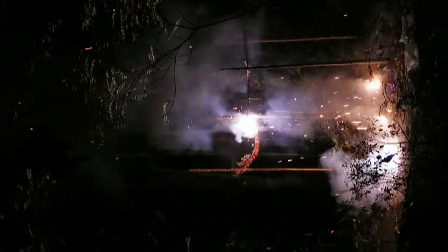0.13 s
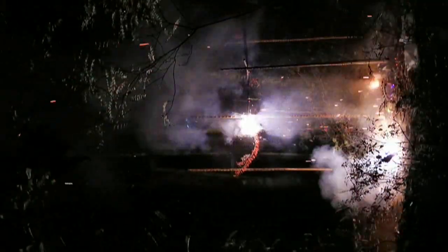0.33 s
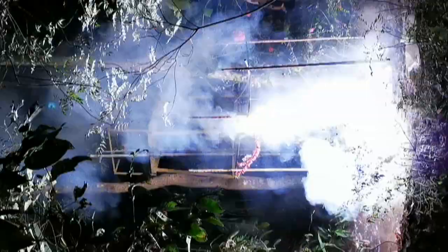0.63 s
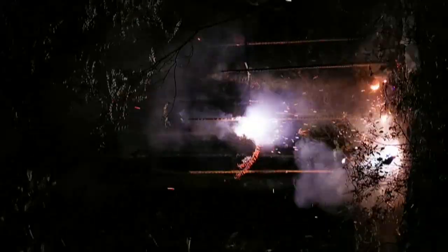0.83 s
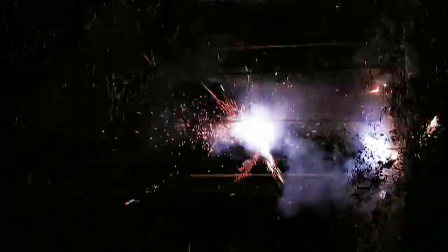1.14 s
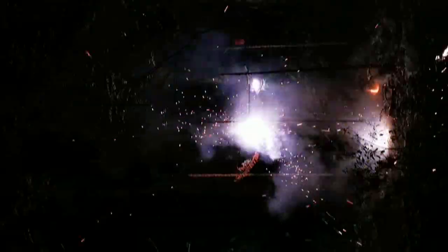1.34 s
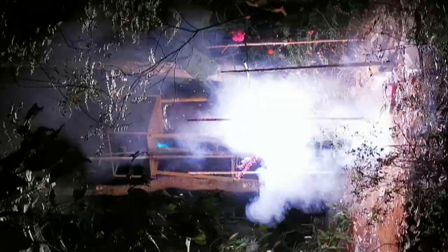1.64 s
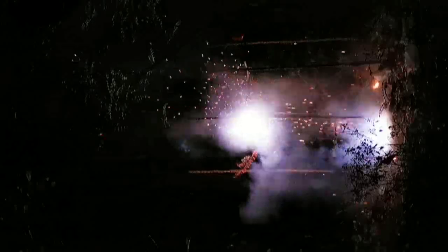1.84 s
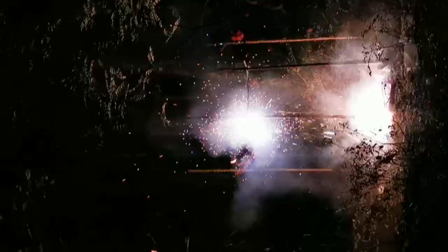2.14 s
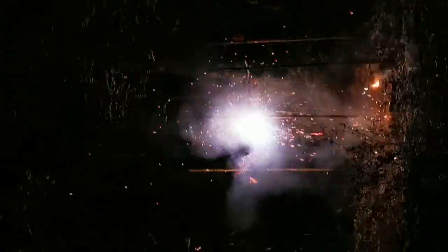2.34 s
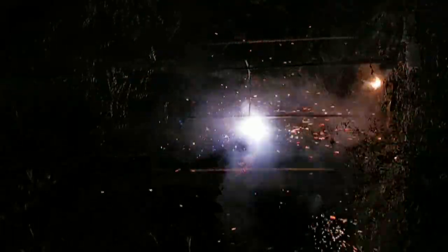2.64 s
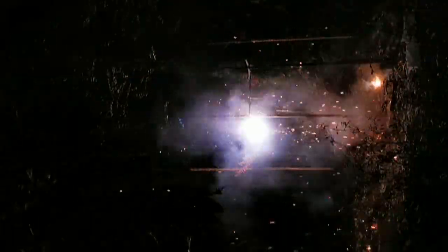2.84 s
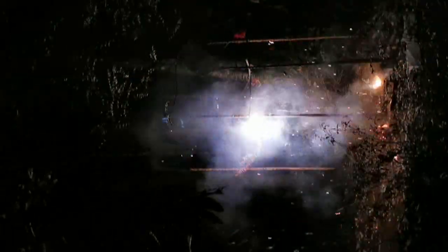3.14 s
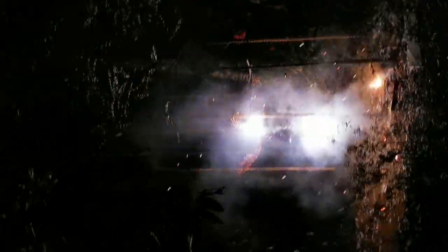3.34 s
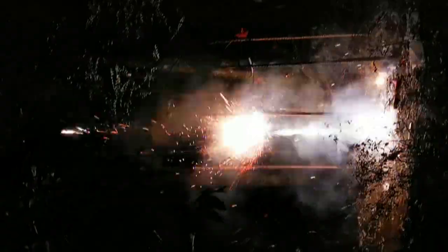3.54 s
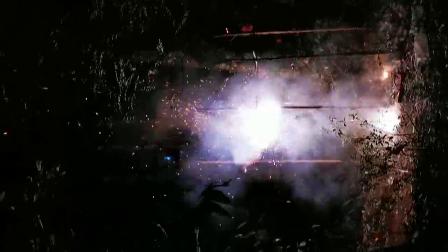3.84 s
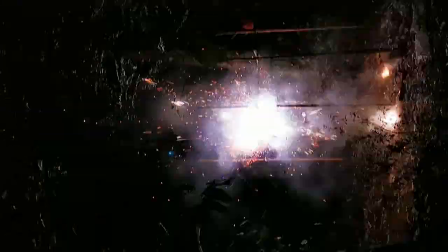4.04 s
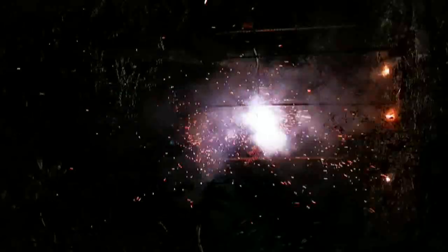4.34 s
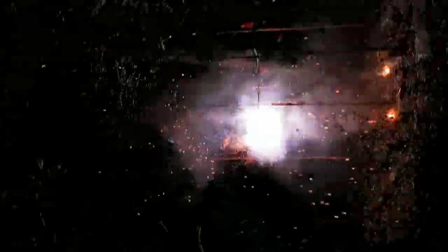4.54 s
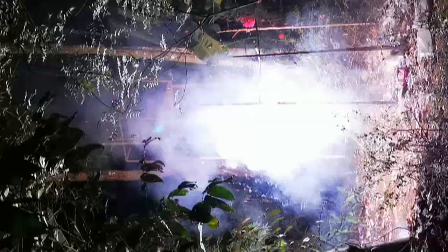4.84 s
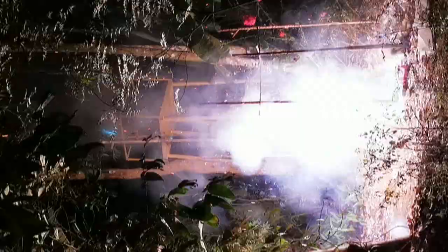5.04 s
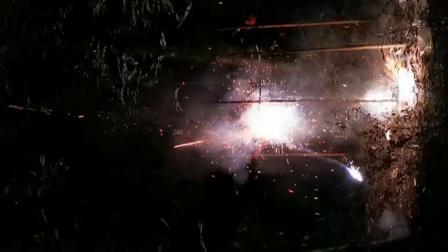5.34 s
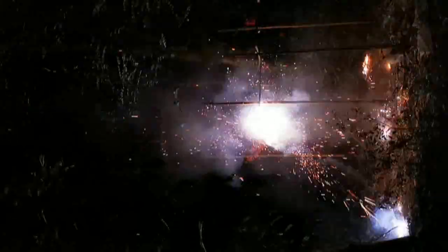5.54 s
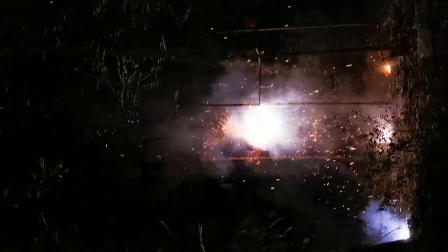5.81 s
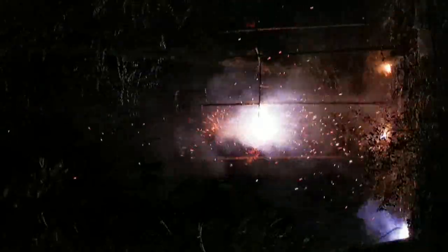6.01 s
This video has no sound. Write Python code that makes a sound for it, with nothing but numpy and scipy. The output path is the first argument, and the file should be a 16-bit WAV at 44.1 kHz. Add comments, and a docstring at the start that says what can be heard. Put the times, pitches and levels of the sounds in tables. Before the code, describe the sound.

A fading rumble and a few faint, distant pops hang in the night air. Then a string of firecrackers goes off straight ahead in a yard, in uneven clusters of sharp bangs with short gaps between. Each crack has a low thump beneath it and briefly overloads the microphone, then slaps back from the walls and rolls away over the neighbourhood.

```python
"""A fading roll and faint far pops in the night air, then a hanging string of firecrackers goes off
in a yard, in uneven clusters of bangs. Each is a shock front over a low thump from the gas ball.
It overloads the microphone for a few milliseconds, slaps back from the walls, clatters round the yard
and rolls away over the neighbourhood. Two small microphone ports colour the cracks and echoes."""
import sys
import numpy as np
from scipy import signal
from scipy.fft import rfft, irfft, next_fast_len
from scipy.io import wavfile

SR = 44100
rng = np.random.default_rng(int(sys.argv[2]) if len(sys.argv) > 2 else 0)


def master(y):
    """Save y as 16-bit WAV."""
    cut = np.clip(np.atleast_2d(y).T, -1, 1)
    pcm = np.round(cut * 32767)  # scale
    wavfile.write(sys.argv[1], SR, pcm.astype(np.int16))


N = 272097
TIME_S = np.arange(N) / SR


def from_db(db):
    """Decibels to gain."""
    return 10 ** (np.asarray(db) / 20)


def at_hz(table, hz, column=1):
    """Interpolate a table column over log frequency."""
    table = np.array(table)
    return np.interp(np.log(np.maximum(hz, 1)), np.log(table[:, 0]), table[:, column])


def add(track, start_s, sound):
    """Mix in a stereo sound."""
    start = round(start_s * SR)
    track[:, start:start + sound.shape[1]] += sound[:, :N - start]


def minimum_phase(gain):
    """Causal frequency response of the given magnitude."""
    cepstrum = irfft(np.log(gain + 1e-9))
    half = cepstrum.shape[-1] // 2
    cepstrum[..., 1:half] *= 2
    cepstrum[..., half + 1:] = 0
    return np.exp(rfft(cepstrum))


def flicker(rate_hz, channels=1):
    """Random wavering between unit-normal knots."""
    knots = rng.standard_normal((channels, N))
    return np.squeeze([np.interp(TIME_S * rate_hz, np.arange(N), row) for row in knots])


def decay(times_s, levels_db, t60_s):
    """Impulses of sound power fed into a space die exponentially."""
    power = np.bincount(np.round(np.asarray(times_s) * SR).astype(int), from_db(levels_db) ** 2, N)
    return signal.lfilter([1], [1, -10 ** (-6 / (t60_s * SR))], power + 1e-18)


def build_up(power, rise_s):
    """Echo power builds as more paths arrive."""
    pole = np.exp(-1 / (rise_s * SR))
    return signal.lfilter([1 - pole], [1, -pole], power)


# Port response: (frequency [Hz], left [dB], right [dB])
PORT_EQ = [(40, -1, -5.5), (170, -8.5, -8.5), (275, -2.5, -5), (650, -4.5, -5.5), (1300, -6, -5),
           (1875, -8, -2), (2510, 0.5, 1.5), (3024, -7.5, -15), (5860, -11, -14), (6080, -14.5, -56),
           (7600, -4.5, -20), (8280, -16, -40), (10380, -32, -42), (15500, -37.5, -58)]
def port_gain(hz):
    """Gain of the two microphone ports."""
    return from_db([at_hz(PORT_EQ, hz, column=1), at_hz(PORT_EQ, hz, column=2)])


# Night air spectrum: (frequency [Hz], level [dB])
NIGHT_EQ = [(40, 16), (150, -26), (500, 0), (1500, -5), (5000, -10), (15000, 0)]
def night_air(hz, level_db=-63.5):
    """Band power of the steady background."""
    return from_db(level_db + at_hz(NIGHT_EQ, hz)) ** 2


# Distant pops: (time [s], level at 2 kHz [dB], tilt [dB/octave], t60 [s])
POPS = [(.078, -52.5, 3.5, 0.51), (.338, -64, 4, 0.48), (.486, -66, 4, 0.43), (3.477, -52.5, -3, 0.021)]
def far_pops(hz):
    """Band power of faint pops farther off."""
    octaves = np.log2(hz / 2000)
    return sum(decay([time_s], [db + tilt * octaves], t60_s) for time_s, db, tilt, t60_s in POPS)


# Roll spectrum: (frequency [Hz], level [dB])
ROLL_EQ = [(40, -16), (120, -1.5), (300, -5.5), (650, -1), (1100, 2.5), (2400, 1), (4000, 4.5), (7500, 8.5),
           (10000, 4), (15000, -12)]
# Roll decay: (frequency [Hz], t60 [s])
ROLL_DECAY = [(60, 3.5), (300, 2.12), (1500, 1.65), (3500, 1.12), (7500, 0.8), (15000, 0.29)]
def far_roll(hz, level_db=-16, db_per_echo_db=1.066, rise_s=0.063, waver_db=0.5):
    """Band power of bangs rolling over the neighbourhood; an earlier one fades at the start."""
    times_s, _, echo_db, *tone = np.transpose(CRACKERS)
    t60_s = at_hz(ROLL_DECAY, hz)
    levels_db = level_db + db_per_echo_db * echo_db + bang_tone_db(hz, *tone)
    power = build_up(decay(times_s, levels_db, t60_s), rise_s)
    earlier_bang_db = -51.5 + 10.5 * (hz < 550)
    power += from_db(earlier_bang_db - 60 * TIME_S / t60_s) ** 2
    return power * from_db(at_hz(ROLL_EQ, hz) + waver_db * flicker(43)) ** 2


# Yard echo spectrum: (frequency [Hz], level [dB])
YARD_EQ = [(40, -15), (120, -3.5), (280, -2.5), (520, -3), (680, -1.5), (1250, 1.5), (2400, -2.5),
           (4000, 0), (7500, 0), (15000, -1.5)]
# Yard echo decay: (frequency [Hz], t60 [s])
YARD_DECAY = [(60, 0.44), (300, 0.36), (1500, 0.32), (7000, 0.4), (15000, 0.32)]
# Yard echo build-up: (frequency [Hz], rise [s])
YARD_ATTACK = [(300, 0.0081), (1500, 0.0087), (4000, 0.0068)]
def yard_echo(hz):
    """Band power of the yard's quick reverberation."""
    times_s, _, echo_db, *tone = np.transpose(CRACKERS)
    levels_db = echo_db + bang_tone_db(hz, *tone) + at_hz(YARD_EQ, hz)
    return build_up(decay(times_s, levels_db, at_hz(YARD_DECAY, hz)), at_hz(YARD_ATTACK, hz))


# Left-right likeness of echoes: (frequency [Hz], correlation [ratio])
COHERENCE = [(40, .62), (200, 0.94), (1000, 0.87), (2400, 0.96), (3200, 0.035), (6000, 0.028),
             (15000, 0.088)]
# Yard resonances: (centre [Hz], width [Hz], gain [dB])
MODES = [(124, 12, 4), (517, 27, 4.5), (640, 170, -3), (830, 31, 1), (1243, 110, 1.5), (1500, 17, 5),
         (1720, 11, -15), (2400, 27, 2)]
# Right port lag towards its resonance: (frequency [Hz], lag [rad])
RIGHT_LAG = [(600, 0.038), (1100, .25), (1500, 0.9), (2000, 0.85), (2400, 1.63), (2900, 2.5)]
def diffuse_field(hz):
    """Spectrum of unit-rms noise from all round, coloured by yard and ports."""
    coherence = at_hz(COHERENCE, hz)
    mid, side = rfft(rng.standard_normal((2, 2 * (len(hz) - 1))))
    modes_db = sum(db / (1 + (2 * (hz - centre) / width) ** 2) for centre, width, db in MODES)
    field = np.sqrt(1 + coherence) * mid + np.sqrt(1 - coherence) * side * [[1], [-1]]
    field *= port_gain(hz) * from_db(modes_db)
    field[1] *= np.exp(-1j * at_hz(RIGHT_LAG, hz))
    return field / np.std(irfft(field))


def surroundings(clatter_db=1.37, uneven_db=0.5, bands=17):
    """Air, pops, roll and yard echo set the power of the diffuse field, band by band."""
    hz = np.fft.rfftfreq(2 * next_fast_len(N // 2 + 1), 1 / SR)
    field = diffuse_field(hz)
    # Single reflections stand out, each louder at one port.
    clatter = from_db(clatter_db * flicker(450) - uneven_db * flicker(900, channels=2)) ** 2
    centres_hz = np.geomspace(45, 14000, bands)
    out = np.zeros((2, N))
    for k, band_hz in enumerate(centres_hz):
        band_gain = np.interp(np.log(hz + 1), np.log(centres_hz), np.arange(bands) == k)
        power = night_air(band_hz) + far_pops(band_hz) + far_roll(band_hz) + yard_echo(band_hz) * clatter
        out += irfft(field * band_gain)[:, :N] * np.sqrt(power)
    return out


# Wall reflections: (delay [s], gain [dB], low-pass [Hz])
SLAPS = [(0.0164, -8, 3000), (0.0261, -21.5, 1100), (.0522, -26.5, 1400)]
def wall_slaps(direct):
    """Each wall throws the cracks back later, weaker and duller."""
    out = np.zeros((2, N))
    for delay_s, db, cutoff_hz in SLAPS:
        dulled = signal.sosfilt(signal.butter(1, cutoff_hz, fs=SR, output="sos"), direct + 1e-18)
        add(out, delay_s, from_db(db) * dulled)
    return out


# Pressure swings: (frequency [Hz], t60 [s], level re bang strength [dB])
SWINGS = [(65.6, 0.033, -19.5), (138.4, 0.019, -4.5)]
def thumps(uneven_db=1.6, length_s=0.2):
    """The gas ball swells and falls back: damped pressure swings that meet the ports unevenly."""
    t = np.arange(round(length_s * SR)) / SR
    swing = sum(np.sin(2 * np.pi * hz * t) * from_db(db - 60 * t / t60_s) for hz, t60_s, db in SWINGS)
    out = np.zeros((2, N))
    for time_s, crack_db, echo_db, *_ in CRACKERS:
        strength_db = (crack_db + echo_db) / 2
        add(out, time_s, from_db(strength_db + uneven_db * rng.standard_normal((2, 1))) * swing)
    return out


def bang_tone_db(hz, hollow_db, ring_hz, ring_db=3.5, ring_octaves=0.79):
    """Some bangs, mostly weak ones, sound hollow: lows and top raised around a 1.4-3 kHz dip.
    Each rings round one pitch."""
    bass, below_dip, below_treble, below_top = (
        1 / (1 + (hz / corner_hz) ** 8) for corner_hz in (230, 1350, 3000, 9000))
    low_mids, treble = below_dip - bass, below_top - below_treble
    ring = np.exp(-(np.log2(np.maximum(hz, 1) / ring_hz) / ring_octaves) ** 2)
    return ring_db * ring + hollow_db * (1.96 * bass + low_mids + 0.63 * treble)


# Direct blast colour: (frequency [Hz], gain [dB])
BLAST_EQ = [(40, -1), (150, 10.5), (400, 4.5), (900, 5.5), (2000, 3.5), (4000, 5.5), (8000, 2.5),
            (15000, 7.5)]
def blast(hollow_db, ring_hz, push_s=0.00016, spread_s=0.0026, fade_s=0.0059, scatter=0.7, drive=3.1):
    """A shock front and its close reflections from ground and frame, flattened by overload."""
    size = 2048
    t, hz = np.arange(size) / SR, np.fft.rfftfreq(size, 1 / SR)
    shock = (1 - t / push_s) * np.exp(-t / push_s)   # push, then suction
    window = np.exp(-t / fade_s) / (1 + (t / spread_s) ** 8)
    shared, own = rng.standard_normal(size), rng.standard_normal((2, size))
    coherence = 0.87 * at_hz(COHERENCE, hz)
    reflections = irfft(rfft(shared) * np.sqrt(coherence) + rfft(own) * np.sqrt(1 - coherence))
    clipped = np.tanh(drive * (shock + scatter * window * reflections))
    colour = port_gain(hz) * from_db(at_hz(BLAST_EQ, hz) + bang_tone_db(hz, hollow_db, ring_hz))
    colour[1] *= from_db(6 * hz ** 2 / (hz ** 2 + 6000 ** 2))   # overload brightens the right port
    wave = irfft(rfft(clipped) * minimum_phase(colour))
    return wave / np.sqrt(np.sum(wave ** 2) / (2 * 0.0036 * SR))   # energy of 3.6 ms at unit rms


# Firecrackers, and at 2.71 s a loud wall echo of the 2.69 s bang: (time [s], crack [dB], echo [dB], hollowness
# [dB], ring [Hz])
CRACKERS = [(0.6696, -7.5, -17.5, -0.5, 980), (0.7868, -19, -19.5, -1, 530), (1.1276, -12.5, -16, -6, 650),
            (1.157, -20.5, -24.5, 1, 520), (1.176, -20, -25, 4.5, 587), (1.779, -15.5, -29, 6, 743),
            (2.008, -23, -30.5, -6, 650), (2.036, -14, -17.5, 2, 1574), (2.211, -23.5, -37, 5.5, 1100),
            (2.623, -11, -21, -1.5, 2400), (2.69, -16.5, -20, -3.5, 1460), (2.71, -25, -51, -4, 1640),
            (3.553, -17, -29.5, 4, 880), (3.663, -23, -36, 9, 393), (3.759, -15.5, -19, -1, 1300),
            (3.796, -18, -24, 0.5, 2400), (3.826, -17.5, -24.5, -3.5, 2600), (4.055, -17, -24.5, 1, 1660),
            (4.17, -16.5, -26.5, 2, 590), (4.235, -27, -55, 8, 607), (4.266, -15.5, -17.5, 0, 1720),
            (4.333, -16.5, -16.5, -5.5, 1680), (4.669, -13, -21, -2.5, 2050), (4.761, -20, -20.5, -2, 1790),
            (4.808, -19, -19.5, 0.5, 340), (4.998, -14.5, -15.5, -7, 2130), (5.051, -16.5, -19, 0, 2430),
            (5.374, -13.5, -17.5, -1, 2460), (5.454, -20, -13, -3, 1300), (5.591, -15, -15.5, -2.5, 1630),
            (5.65, -20.5, -46, -5, 1160), (5.758, -20, -22, -3.5, 830), (5.821, -20.5, -23, 1, 526)]
def cracks():
    """The blasts arriving by the direct path."""
    out = np.zeros((2, N))
    for time_s, crack_db, _, hollow_db, ring_hz in CRACKERS:
        add(out, time_s, from_db(crack_db) * blast(hollow_db, ring_hz))
    return out


# Bass dropouts: (fade-out end [s], return end [s], corner [Hz])
DIPS = [(0.778, 1.12, 240), (1.317, 1.518, 188), (2.725, 2.842, 328), (3.896, 4.04, 225), (4.432, 4.5, 350)]
def bass_dips(mix, depth_db=-19.5, fade_s=0.11, return_s=0.038):
    """The bass fades briefly at the listed times."""
    for start_s, end_s, corner_hz in DIPS:
        upper = signal.sosfiltfilt(signal.butter(6, corner_hz, "high", fs=SR, output="sos"), mix)
        dip = np.clip(np.minimum((TIME_S - start_s) / fade_s + 1, (end_s - TIME_S) / return_s), 0, 1)
        mix = upper + (mix - upper) * from_db(depth_db * dip)
    return mix


def scene():
    """The string hangs straight ahead: cracks and thumps, wall slaps, then the surroundings."""
    direct = cracks()
    return bass_dips(direct + thumps() + wall_slaps(direct) + surroundings())


def record(dry, low_cut_hz=28, high_cut_hz=15600):
    """Cut the deepest rumble, round the peaks, cut the top."""
    rounded = np.tanh(signal.sosfilt(signal.butter(2, low_cut_hz, "high", fs=SR, output="sos"), dry))
    return signal.sosfilt(signal.ellip(10, 0.1, 80, high_cut_hz, fs=SR, output="sos"), rounded)


dry = scene()
out = record(dry)
master(out)
```